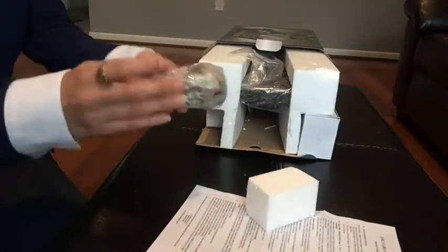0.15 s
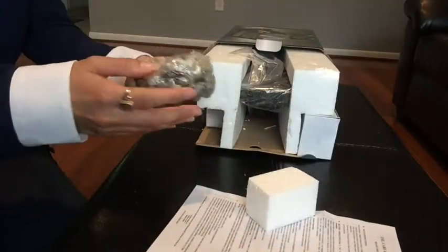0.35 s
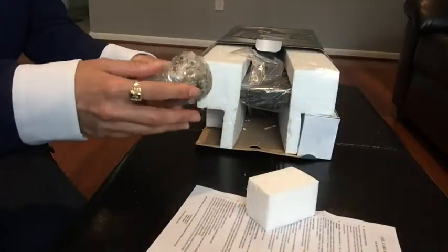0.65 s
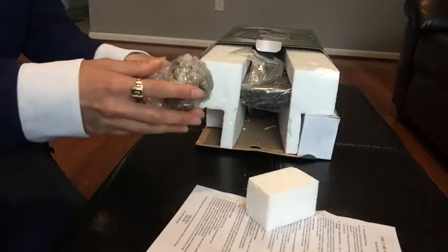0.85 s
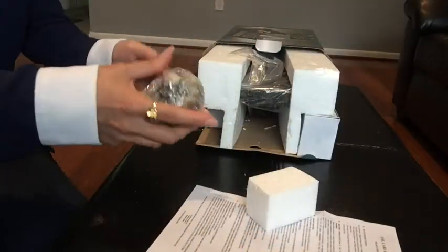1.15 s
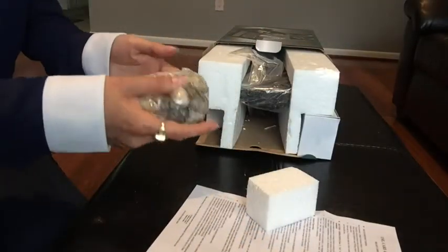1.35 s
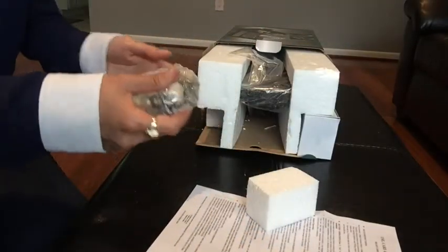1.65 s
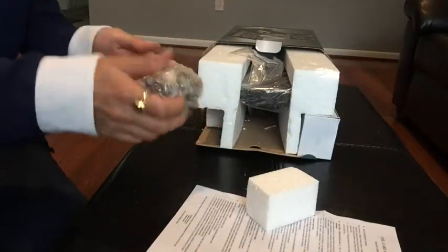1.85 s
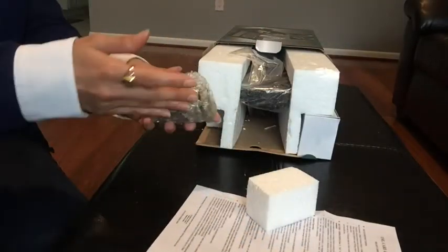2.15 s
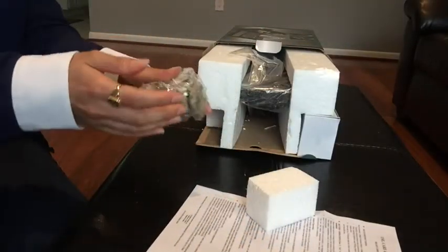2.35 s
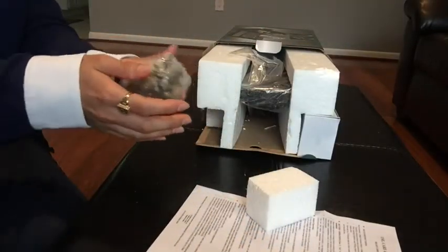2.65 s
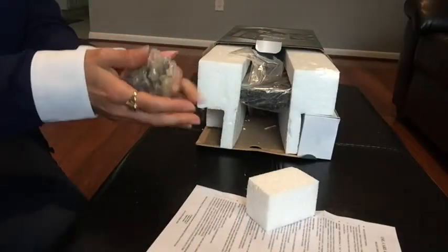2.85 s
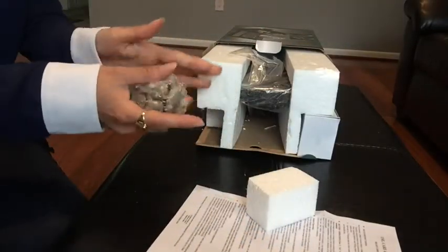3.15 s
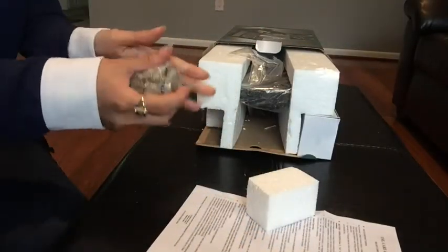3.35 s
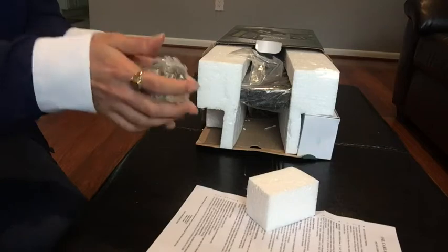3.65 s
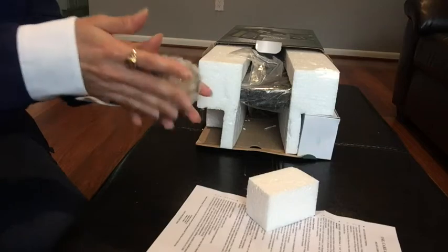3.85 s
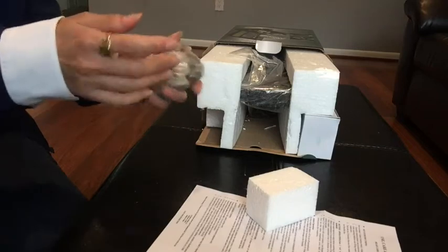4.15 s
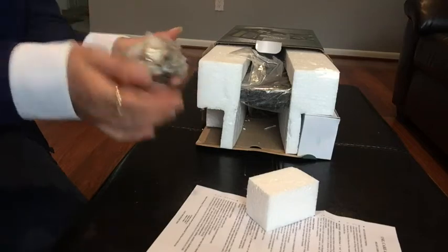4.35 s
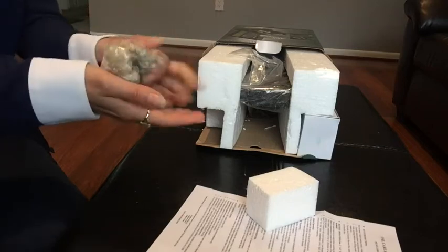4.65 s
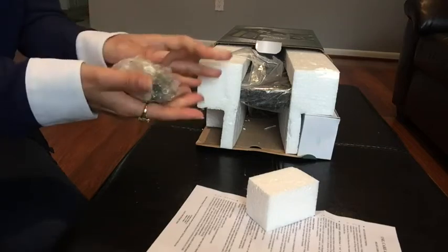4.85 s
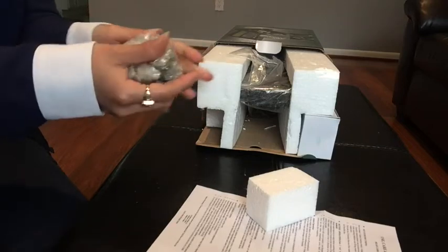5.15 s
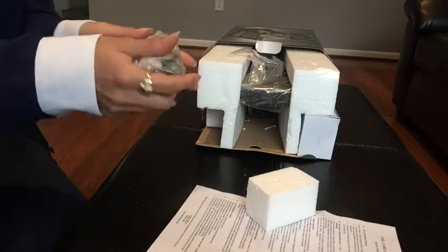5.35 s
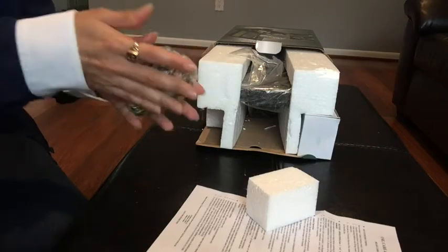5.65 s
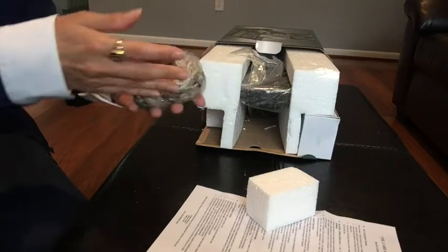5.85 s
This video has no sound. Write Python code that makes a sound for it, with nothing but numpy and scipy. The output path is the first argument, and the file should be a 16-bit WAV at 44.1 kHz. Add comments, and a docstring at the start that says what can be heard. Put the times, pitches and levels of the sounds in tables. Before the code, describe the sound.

Two hands knead a wad of thin plastic wrap close to the microphone in a small quiet room. Dense, bright crinkling comes in quick uneven bursts, strongest in the first moments, with sharp ticks and papery crunches. Later squeezes are somewhat softer, with occasional dull palm pats. Low rumble and very faint hiss lie underneath.

```python
"""A wad of plastic wrap is rolled and squeezed into a ball by two hands, over a table in a quiet room.
Swarms of tiny buckles drive filter banks for a dense crinkle, the crunch of the folds and the palms' rub.
Creases snap as impulses through resonances: a high tick and a facet's ring. Now and then the palms pat
the soft ball, a short decaying tone with some noise. The table bounces the sound and the room adds a tail.
Below lie low rumble, swelling with the rub, and faint steady hiss, both of filtered noise."""
import sys
import numpy as np
from scipy import signal
from scipy.io import wavfile
from scipy.ndimage import uniform_filter1d

SR = 44100
rng = np.random.default_rng(int(sys.argv[2]) if len(sys.argv) > 2 else 0)


def transcribe(signal):
    """Save signal, clipped to [-1, 1], as a 16-bit WAV file at the path in sys.argv[1]."""
    frames = np.atleast_2d(signal).T
    limited = np.clip(frames, -1, 1)
    pcm = np.round(limited * 32767).astype(np.int16)
    wavfile.write(sys.argv[1], SR, pcm)


N = 264600  # 6 s

# squeezes and rolls of the hands, before the layer trims:
# start t/s, length/s, effort level/dB, crunch of inner folds over effort/dB, palm rub over effort/dB
HAND_SQUEEZES = [(0, 0.08, -50.5, -6, -0.5), (0.151, 0.043, -41.0, -2, -4), (0.221, 0.077, -50, -1.5, -2),
                 (0.36, 0.118, -57.0, -1, -5), (0.544, 0.158, -55.0, -3.5, -7),
                 (0.788, 0.08, -54.5, -12, -22), (0.929, 0.03, -63.5, -13, 3), (1.133, 0.049, -50, 1, -1),
                 (1.203, 0.149, -47.5, 1.5, 1.5), (1.384, 0.2, -48.5, -1, -4),
                 (1.626, 0.043, -49.5, 0.5, 6.5), (1.696, 0.05, -54.0, 5, 2), (1.817, 0.16, -53.5, 3, 2.5),
                 (2.007, 0.063, -56.5, 2.5, -4), (2.175, 0.111, -52.5, 1.5, 0.5),
                 (2.334, 0.21, -52.5, -0.5, -4.5), (2.561, 0.03, -50.0, -0.5, -6),
                 (2.717, 0.087, -53.5, -2.5, 0.5), (2.877, 0.08, -51.0, -1, 0), (2.98, 0.11, -60.5, 4.5, 5),
                 (3.121, 0.054, -54.0, -3, 1), (3.154, 0.115, -61, -1.5, 4),
                 (3.295, 0.109, -53.0, 1.5, -1.5), (3.409, 0.037, -51.0, 2, -8),
                 (3.502, 0.114, -54.5, -2.5, -7), (3.615, 0.042, -53.5, 0.5, 5),
                 (3.7, 0.133, -57.0, 5.5, 1), (3.98, 0.111, -58.0, 3.5, 1), (4.058, 0.17, -57.0, 3, 4.5),
                 (4.238, 0.111, -53.0, -1.5, 3), (4.517, 0.093, -50.5, 2, 3.5), (4.672, 0.079, -50.5, 2, 7),
                 (4.782, 0.118, -57.5, 3.5, 2), (4.93, 0.046, -56.0, 5, -4), (5, 0.158, -57.5, 0.5, 1),
                 (5.206, 0.053, -56.5, -2.5, 3), (5.406, 0.034, -50.5, 2.5, -6),
                 (5.472, 0.125, -53.5, 3, 2.5), (5.624, 0.105, -59.5, 0.5, 3),
                 (5.802, 0.18, -50.0, 0.5, 3.5)]
# colours of the wad's layers, relative density per Hz: f/Hz, level/dB
CRINKLE_COLOUR = [(2000, -4), (4500, -8.5), (5800, -12), (7500, -0.5), (9000, 2), (10500, 6), (12000, -0.5),
                  (13500, -18.5), (16000, -77)]
CRUNCH_COLOUR = [(300, -23.5), (800, -6), (1500, 0), (2200, 1.5), (3000, 0), (3900, 3.5), (5000, -6.5),
                 (7000, 1.5), (12000, -13)]
RUB_COLOUR = [(120, -28), (200, -12.5), (310, -2), (450, -1.5), (800, 3.5), (1150, 3), (1600, -8.5),
              (3000, -4), (8000, -49)]
# hollow of the cupped hands: t/s, level of its upper ring against the crunch/dB
HOLLOW_LEVEL = [(0, -3.5), (.5, -16), (.66, 0.5), (.87, 3), (1.4, -18), (2.9, -4), (4.3, -12.5),
                (5.3, -4.5), (6, -40)]
# the loudest creases that buckle, energies before the lift in the mix:
# t/s, tick level/dB, tick f/Hz, facet ring level/dB, facet f/Hz
LOUD_CREASES = [(0.142, -24, 9500, -30.5, 2900), (0.172, -16.5, 9150, -27, 3950),
                (0.175, -13, 8950, -29, 1700), (0.1942, -15, 8500, -20, 4100),
                (0.2344, -23, 9400, -35, 2300), (0.2577, -22, 8200, -24.5, 4060),
                (0.287, -22, 9900, -21.5, 3020), (0.4493, -30, 7300, -26.5, 4230),
                (0.4698, -17, 10800, -25.5, 3460), (0.4792, -21, 7500, -28, 3100),
                (0.4936, -25, 6800, -35, 3920), (0.5385, -23.5, 8850, -53, 4200),
                (0.6016, -24.5, 7040, -41, 4050), (0.6637, -27.5, 11500, -49, 2300),
                (0.696, -25.5, 10300, -40, 3600), (0.777, -28, 6800, -33, 3200),
                (0.814, -13, 8500, -26, 3000), (0.816, -24, 9500, -26.5, 4500),
                (0.8641, -24, 7500, -22, 2920), (0.8817, -22, 6960, -31, 3070),
                (0.941, -24.5, 8850, -43, 3900), (0.9558, -19.5, 10700, -39, 3500),
                (1.1118, -30, 7500, -26, 3670), (1.1206, -16.5, 10700, -32, 3300),
                (1.1474, -14, 10000, -45, 2600), (1.1496, -14, 9200, -11.5, 2440),
                (1.2165, -19, 10000, -29.5, 2700), (1.3011, -15.5, 9900, -30, 3700),
                (1.3224, -17.5, 9100, -18, 2870), (1.354, -40, 9800, -24, 1950),
                (1.4257, -20.5, 9100, -32, 4000), (1.4734, -16.5, 9800, -24.5, 2860),
                (1.505, -18, 9700, -27, 3100), (1.5222, -15.5, 9300, -26.5, 4030),
                (1.5741, -17, 9700, -23.5, 4000), (1.6726, -19, 10400, -19.5, 2220),
                (1.716, -26.5, 8700, -24.5, 2660), (1.7771, -24, 9500, -28.5, 4030),
                (1.9609, -24, 6240, -20.5, 3770), (2.0568, -22, 9800, -29, 2400),
                (2.2639, -17, 9500, -27, 3400), (2.2705, -20, 9500, -28, 3100),
                (2.4259, -26, 9400, -25.5, 2860), (2.4913, -20, 9300, -29, 2200),
                (2.5726, -16.5, 10900, -30, 3900), (2.5845, -28, 8600, -25, 2300),
                (2.6505, -23, 7500, -36, 4300), (2.7405, -27, 10400, -29.5, 1770),
                (2.7706, -22.5, 10500, -37, 3300), (2.7809, -30, 10600, -30, 1800),
                (2.9287, -25, 10300, -23.5, 2450), (3.0785, -31, 11000, -26.5, 2810),
                (3.1486, -22, 8500, -24.5, 3300), (3.2377, -31, 9600, -27, 2700),
                (3.4026, -28, 7900, -35, 2800), (3.4391, -26, 7850, -27, 2510),
                (4.0031, -25.5, 9150, -49, 4100), (4.146, -27, 9000, -28.5, 1880),
                (4.2542, -16, 10300, -38, 4500), (4.346, -25, 9800, -25.5, 2600),
                (4.487, -29, 10000, -37, 3070), (4.6296, -41, 10000, -27.5, 4260),
                (4.7399, -20.5, 9650, -39, 3300), (4.747, -26, 8800, -33, 2970),
                (4.7765, -25.5, 8650, -28, 3200), (4.878, -26.5, 7000, -38, 2920),
                (5.086, -28, 9700, -37, 3400), (5.2945, -33, 8450, -32, 1500),
                (5.4222, -18.5, 9750, -23.5, 3820), (5.8549, -21, 8650, -36, 3000),
                (5.8678, -15.5, 8950, -26.5, 3870), (5.8708, -11, 10800, -43, 3300),
                (5.937, -22, 7200, -23, 3170)]
# soft blows between hands and ball: t/s, tone level before its envelope/dB, f/Hz
PALM_PATS = [(0.039, -42, 477), (0.042, -48, 258), (0.172, -48, 293), (1.1499, -30, 900),
             (1.149, -41.5, 282), (1.228, -56, 133), (1.268, -41.5, 620), (1.33, -56, 140),
             (1.685, -49, 161), (1.727, -50, 80), (1.767, -60, 170), (1.848, -52, 125), (1.959, -47, 454),
             (2.054, -41.5, 910), (2.438, -40, 900), (3.078, -45, 680), (3.654, -39, 760),
             (4.161, -60, 160), (4.26, -55, 115), (4.723, -46, 715), (4.782, -37, 740), (4.813, -51, 80),
             (4.883, -35.5, 620), (4.935, -45, 610), (5.002, -51, 272), (5.856, -51, 370),
             (5.871, -42, 595), (5.954, -58, 125)]
# colours of the background, relative density per Hz: f/Hz, level/dB
RUMBLE_COLOUR = [(10, 19), (15, 10), (22, 0), (35, -8), (50, -11), (85, -18.5), (118, -16), (160, -31.5),
                 (300, -32), (800, -37.5)]
HISS_COLOUR = [(150, 10.5), (400, -0.5), (800, 1), (2000, -0.5), (6000, 0.5), (12000, -16), (16000, -20)]

# each squeeze builds up over a share of its length, holds, then the wad relaxes;
# between squeezes the film keeps stirring
ATTACK_SHARE, RELAX_DB_PER_S, REST_DB = .38, 145.5, -61.5
USUAL_EFFORT_DB = -54
CRINKLE_TRIM_DB, CRUNCH_TRIM_DB, RUB_TRIM_DB = -3, -6.5, -15
# the hollow's two resonances wander with the grip; the upper one sinks as the ball takes shape
HOLLOW_LOWER_HZ, HOLLOW_UPPER_HZ, HOLLOW_SINK_HZ_PER_S = 885, 2800, 170
GRIP_OCT, GRIPS_PER_S = 0.17, 3.3
# lesser creases: typical energies and pitches at the usual effort, and how far they scatter
TICK_DB, FACET_DB, SCATTER_DB = -31.5, -37, 1
TICK_HZ, FACET_HZ, TICK_SCATTER_OCT, FACET_SCATTER_OCT = 9500, 3200, 0.14, 0.23
SNAP_FOLLOWS = 0.18  # dB of snap per dB of effort
SNAP_LIFT_DB = 1.0
PAT_CYCLES = 5.3  # cycles until a pat has died away by 60 dB
ROOM_DB, ROOM_T60_S, TABLE_DB, TABLE_DELAY_S = -17.5, 0.28, -32.5, .0023
# the rumble swells as the arms move: dB per dB of palm rub, and how sluggishly
RUMBLE_FOLLOWS, ARM_SMOOTH_S = 0.42, 0.2
RUMBLE_DB, HISS_DB = -52, -74  # the rumble's level holds for rub at the usual effort
CUTOFF_HZ = 16200


def from_db(db):
    """Decibels to amplitude."""
    return 10 ** (np.asarray(db) / 20)


def rms_one(x):
    """Scales to an rms of 1."""
    return x / np.sqrt(np.mean(x ** 2) + 1e-20)


def energy_one(x):
    """Scales to a summed square of 1."""
    return x / np.sqrt(np.sum(x ** 2) + 1e-20)


def drift(per_s):
    """Random wander with an rms of 1, straight between per_s knots a second."""
    knots = rng.standard_normal(8192)
    return rms_one(np.interp(np.arange(N) / SR * per_s, np.arange(len(knots)), knots))


def resonance(x, hz, width_hz):
    """Two-pole resonance with gain 1 on top."""
    r = np.exp(-np.pi * width_hz / SR)
    zeros = np.array([1, 0, -1]) * (1 - r * r) / 2
    poles = [1, -2 * r * np.cos(2 * np.pi * hz / SR), r * r]
    return signal.lfilter(zeros, poles, x)


def gliding_resonance(x, hz, width_hz, size=256):
    """A resonance whose centre follows a curve, block by block; rms 1."""
    r, state, out = np.exp(-np.pi * width_hz / SR), np.zeros(2), np.zeros(N)
    for i in range(0, N, size):
        poles = [1, -2 * r * np.cos(2 * np.pi * hz[i] / SR), r * r]
        out[i:i + size], state = signal.lfilter([1, 0, -1], poles, x[i:i + size], zi=state)
    return rms_one(out)


def low_pass(x, hz, order=2):
    """Butterworth low-pass."""
    return signal.sosfilt(signal.butter(order, min(hz, SR / 2 - 100), fs=SR, output="sos"), x)


def add(out, s, sound):
    """Mixes a short sound in at time s."""
    i = int(np.clip(round(s * SR), 0, N - 1))
    out[i:i + len(sound)] += sound[:N - i]


def coloured(drive, spectrum, count, patchy_db=0, patches_per_s=5):
    """A bank of bands, each struck with its own random strength at every sample of the drive; rms 1."""
    hz, db = np.transpose(spectrum)
    edges = np.geomspace(hz[0], min(hz[-1], SR / 2 - 100), count + 1)
    out = np.zeros(N)
    for low, high in zip(edges, edges[1:]):
        band = signal.butter(2, [low, high], "band", fs=SR, output="sos")
        colour_db = np.interp(np.log(low * high) / 2, np.log(hz), db)
        # each band waxes and wanes by patchy_db as the source changes shape
        gain = from_db(colour_db + patchy_db * drift(patches_per_s))
        strikes = drive * rng.standard_normal(N) + 1e-18
        out += gain * signal.sosfilt(band, strikes)
    return rms_one(out)


def kneading():
    """Levels in dB of crinkle, crunch and rub: every squeeze is an attack, a hold and a release."""
    t, power = np.arange(0, N, 32) / SR, from_db(REST_DB) ** 2
    for s, length, effort_db, fold_db, palm_db in HAND_SQUEEZES:
        rise = np.clip((t - s) / (ATTACK_SHARE * length), 0, 1)
        relax_db = RELAX_DB_PER_S * np.maximum(t - s - length, 0)
        press = rise * from_db(effort_db - relax_db)
        power = power + np.array([press, press * from_db(fold_db), press * from_db(palm_db)]) ** 2
    return [np.interp(np.arange(N) / SR, t, 10 * np.log10(p)) for p in power]


def wad(effort_db, crunch_db, rub_db, crowding=.6, blending=0.073):
    """The same small buckles sound bright in the outer film and duller in the folds; palms add a low rasp."""
    # a harder squeeze flips more folds per second, so single ones stand out less
    squeeze_db = effort_db - USUAL_EFFORT_DB
    crowd = from_db(crowding * squeeze_db)
    shared = grains(per_s=420 * crowd, spread_db=4.5, clump_db=3.0, clumps_per_s=86, slide_db=0)
    film = grains(per_s=1300 * crowd, spread_db=5.5, clump_db=0.5, clumps_per_s=160, slide_db=-12.5)
    folds = grains(per_s=750 * crowd, spread_db=4.5, clump_db=8.5, clumps_per_s=99, slide_db=-26.0)
    shared = shared + stray_ticks(size_db=23.0) * from_db(-blending * squeeze_db)
    crinkle = coloured(shared + from_db(0.5) * film, CRINKLE_COLOUR, count=12, patchy_db=1.0)
    crunch = coloured(shared + from_db(-11.5) * folds, CRUNCH_COLOUR, count=16, patchy_db=1.54)
    crunch = crunch + hollow(film)
    rub = coloured(shared + from_db(-8.5) * folds, RUB_COLOUR, count=13, patchy_db=3.4)
    return (from_db(effort_db + CRINKLE_TRIM_DB) * crinkle
            + from_db(crunch_db + CRUNCH_TRIM_DB) * crunch
            + from_db(rub_db + RUB_TRIM_DB) * rub)


def grains(per_s, spread_db, clump_db, clumps_per_s, slide_db):
    """Tiny buckles of uneven size that come in clumps, over smooth sliding friction; even in power."""
    born = rng.random(N) < per_s / SR
    sizes = from_db(spread_db * np.minimum(rng.exponential(1, N), 2.5))
    clumps = from_db(clump_db * drift(clumps_per_s))
    drive = (rms_one(born * sizes) + from_db(slide_db)) * clumps
    # evened over about 34 ms
    return drive / np.sqrt(uniform_filter1d(drive ** 2, size=1500) + 1e-12)


def stray_ticks(size_db, per_s=46, spread_db=4.0):
    """Now and then a somewhat larger fold gives way and stands out of the crinkle."""
    born = rng.random(N) < per_s / SR
    return born * from_db(size_db + spread_db * np.clip(rng.standard_normal(N), -1.5, 1.5))


def hollow(drive, lower_db=-4.5, lower_width_hz=220, upper_width_hz=680):
    """Rustle between the palms rings in the air that they enclose; the pitch moves with the grip."""
    t = np.arange(N) / SR
    level_db = np.interp(t, *np.transpose(HOLLOW_LEVEL))
    grip = 2 ** (GRIP_OCT * drift(GRIPS_PER_S))
    lower_hz = grip * HOLLOW_LOWER_HZ
    upper_hz = grip * (HOLLOW_UPPER_HZ - HOLLOW_SINK_HZ_PER_S * t)
    rustle = drive * rng.standard_normal(N)
    lower = gliding_resonance(rustle, lower_hz, lower_width_hz)
    upper = gliding_resonance(rustle, upper_hz, upper_width_hz)
    return from_db(level_db) * (from_db(lower_db) * lower + upper)


def snaps(creases, tick_width_hz=3800, facet_width_hz=2400, flutter_db=-17, flutter_s=0.00085,
          top_hz=12500, facet_top_hz=5000, bass_edge=0.44, usual_db=-22, cascading=0.97):
    """A crease flips: an impulse and brief flutter, heard as a high tick and the ring of the facet beside it."""
    out, t = np.zeros(N), np.arange(400) / SR
    chances = rng.standard_normal((len(creases), len(t)))
    for (s, tick_db, tick_hz, facet_db, facet_hz), chance in zip(creases, chances):
        # a strong flip sets off its neighbours
        flutter = from_db(flutter_db + cascading * max(tick_db - usual_db, 0))
        flip = (t == 0) + flutter * chance * np.exp(-t / flutter_s)
        tick = resonance(flip, tick_hz, tick_width_hz)
        tick = low_pass(resonance(tick, tick_hz, 2 * tick_width_hz), top_hz, order=4)
        facet = low_pass(resonance(flip, facet_hz, facet_width_hz), facet_top_hz)
        # a small facet radiates little below its own pitch
        bass_cut = signal.butter(2, bass_edge * facet_hz, "high", fs=SR, output="sos")
        facet = signal.sosfilt(bass_cut, facet)
        add(out, s, from_db(tick_db) * energy_one(tick) + from_db(facet_db) * energy_one(facet))
    return out


def lesser_snaps(effort_db, count=64, crowding=1.5):
    """Rows like the loud creases, at random moments; harder squeezes draw more and stronger ones."""
    strain = np.cumsum(from_db(crowding * effort_db))
    at = np.searchsorted(strain / strain[-1], rng.random(count))
    force_db = SNAP_FOLLOWS * (effort_db[at] - USUAL_EFFORT_DB)
    tick, tick_pitch, facet, facet_pitch = np.clip(rng.standard_normal((count, 4)), -2, 2).T
    return np.transpose([at / SR,
                         TICK_DB + force_db + SCATTER_DB * tick,
                         TICK_HZ * 2 ** (TICK_SCATTER_OCT * tick_pitch),
                         FACET_DB + force_db + SCATTER_DB * facet,
                         FACET_HZ * 2 ** (FACET_SCATTER_OCT * facet_pitch)])


def pats(rough=0.51):
    """The air pocket between palm and ball rings for a few uneven cycles."""
    out, t = np.zeros(N), np.arange(4000) / SR
    chances = rng.standard_normal((len(PALM_PATS), len(t)))
    for (s, db, hz), chance in zip(PALM_PATS, chances):
        pocket = np.sin(2 * np.pi * hz * t) + rough * rms_one(resonance(chance, hz, hz))
        decay = from_db(db - 60 * hz * t / PAT_CYCLES)
        onset = 1 - np.exp(-4 * hz * t)
        add(out, s, decay * onset * pocket)
    return out


def room(x, wall_cut_hz=13000, first_wall_s=0.0012, count=13):
    """A bounce off the table top, then a short tail; each place of the moving ball has its own reflections."""
    t, place = np.arange(SR // 2) / SR, np.linspace(0, count - 1, N)
    bounce = np.interp(np.arange(N) - round(TABLE_DELAY_S * SR), np.arange(N), x, left=0)
    out = x + from_db(TABLE_DB) * bounce
    decay = from_db(-60 * t / ROOM_T60_S) * np.minimum(t / first_wall_s, 1) ** 2
    for k in range(count):
        # equal-power crossfade from place to place
        nearness = np.sqrt(np.maximum(1 - np.abs(place - k), 0))
        tail = energy_one(low_pass(rng.standard_normal(len(t)), wall_cut_hz) * decay)
        out += from_db(ROOM_DB) * signal.fftconvolve(x * nearness, tail)[:N]
    return out


def low_rumble(rub_db):
    """Low noise of the room, which swells smoothly with the palm rub as the arms move."""
    swell_db = RUMBLE_FOLLOWS * uniform_filter1d(rub_db - USUAL_EFFORT_DB, int(ARM_SMOOTH_S * SR))
    return from_db(RUMBLE_DB + swell_db) * coloured(1, RUMBLE_COLOUR, count=12)


def faint_hiss():
    """Steady broadband noise through a bank of bands."""
    return from_db(HISS_DB) * coloured(1, HISS_COLOUR, count=8)


def scene():
    """The wad, its snaps and the pats in the room, over rumble and hiss."""
    effort_db, crunch_db, rub_db = kneading()
    rustle = wad(effort_db, crunch_db, rub_db)
    creases = snaps(np.vstack([LOUD_CREASES, lesser_snaps(effort_db)]))
    ball = rustle + from_db(SNAP_LIFT_DB) * creases + pats()
    return (room(ball) + low_rumble(rub_db) + faint_hiss())[None]


def record(dry):
    """The top is cut steeply by an elliptic low-pass."""
    return signal.sosfilt(signal.ellip(10, .1, 80, CUTOFF_HZ, fs=SR, output="sos"), dry)


dry = scene()
out = record(dry)
transcribe(out)
```